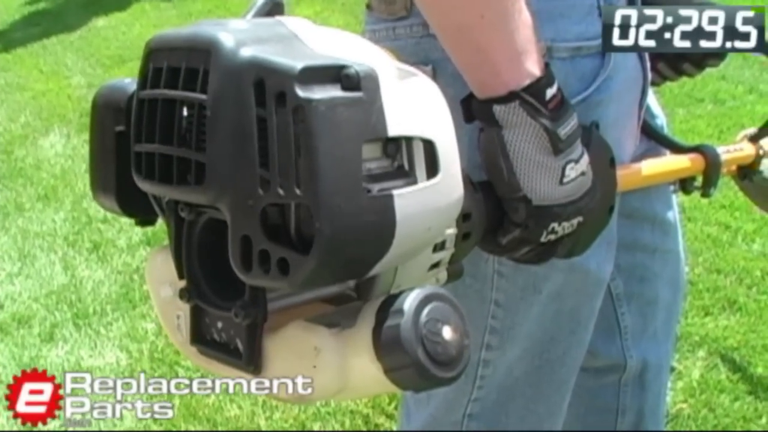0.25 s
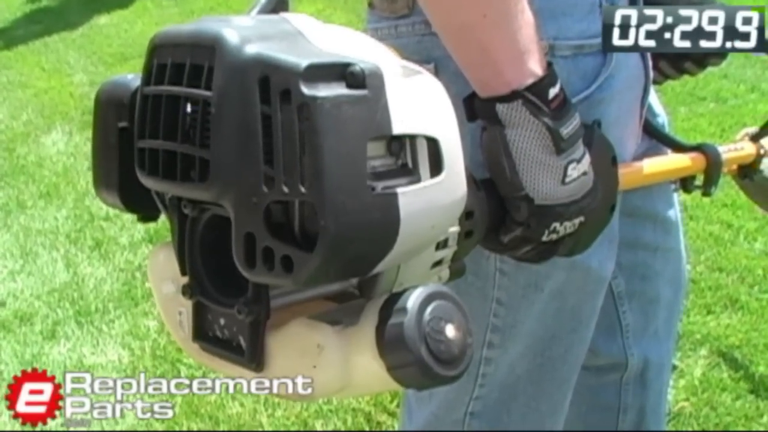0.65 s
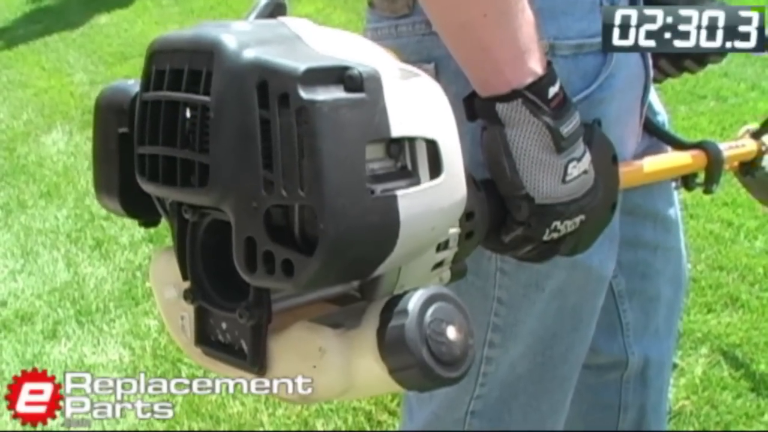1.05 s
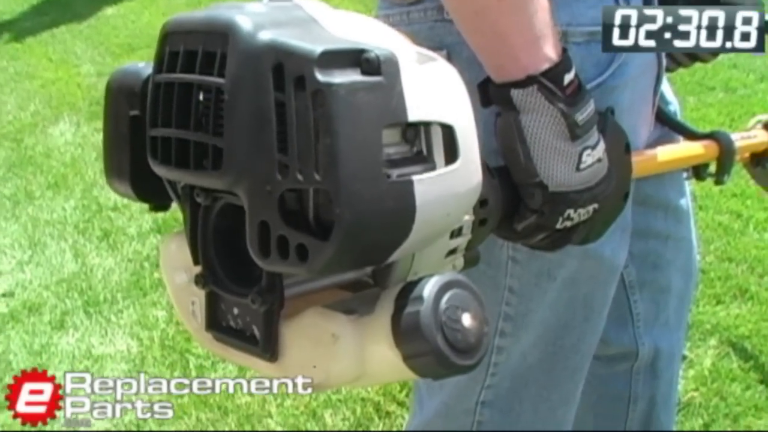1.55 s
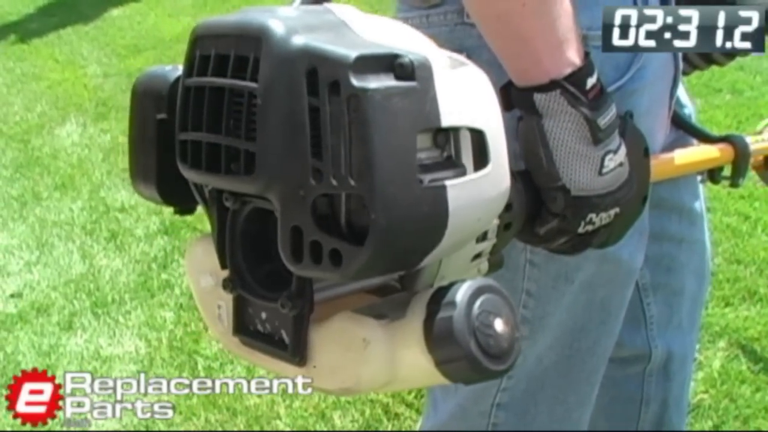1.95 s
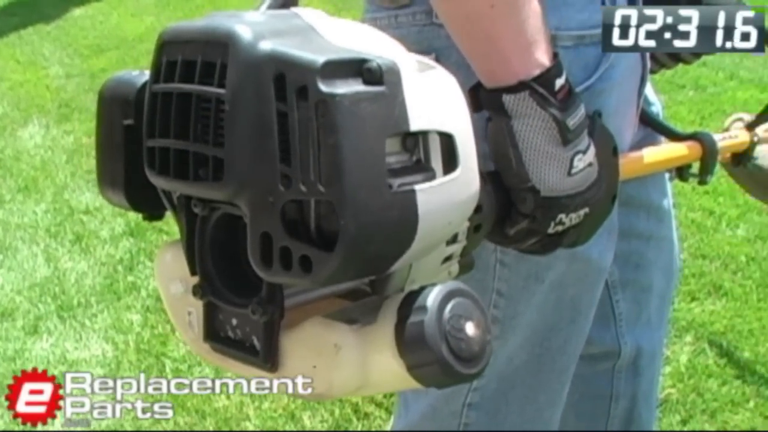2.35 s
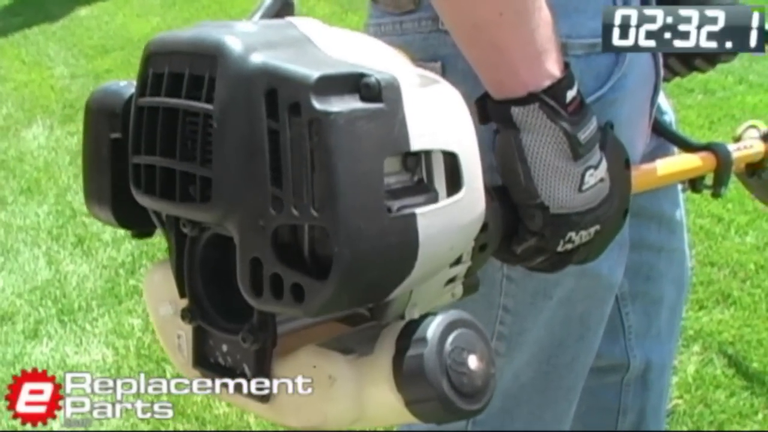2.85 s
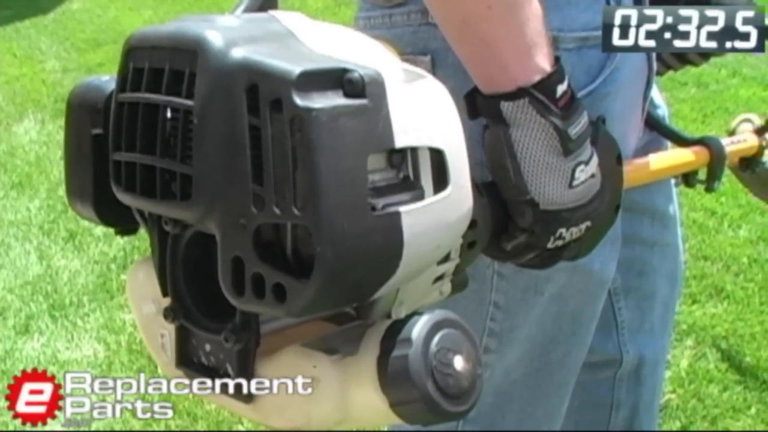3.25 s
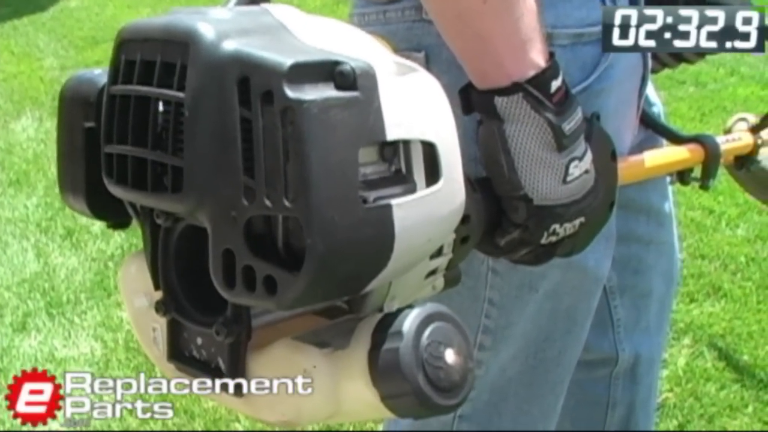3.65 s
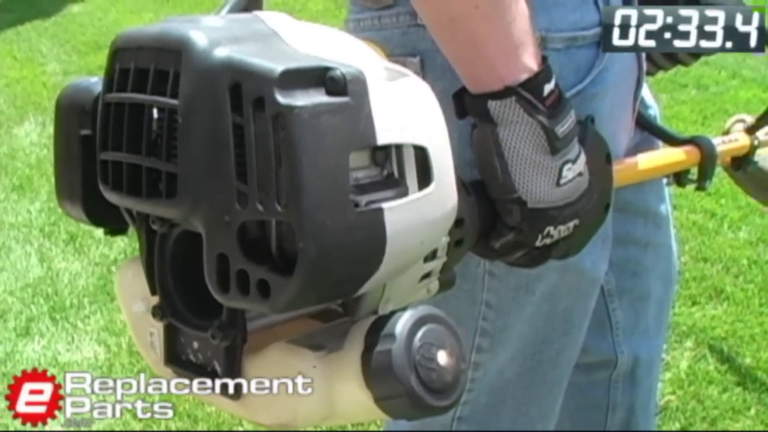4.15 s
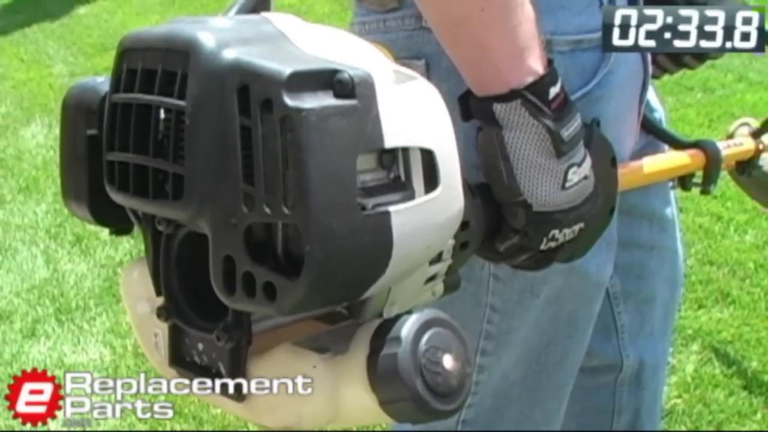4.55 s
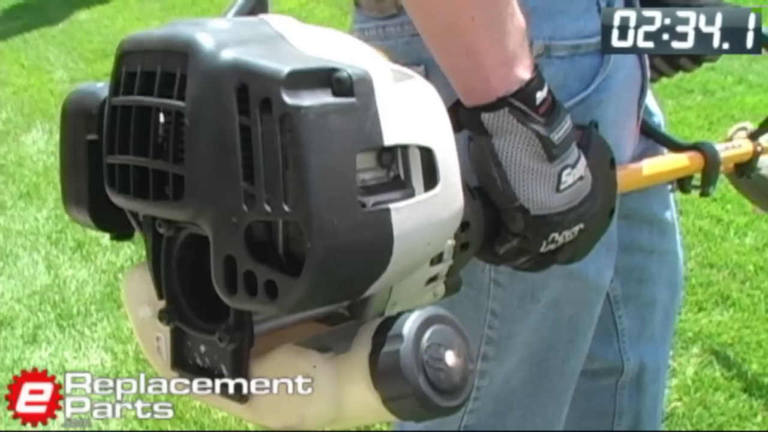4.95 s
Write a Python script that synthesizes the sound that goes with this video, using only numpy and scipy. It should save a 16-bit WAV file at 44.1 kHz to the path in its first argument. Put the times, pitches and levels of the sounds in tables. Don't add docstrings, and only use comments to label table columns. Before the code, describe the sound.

Close stereo pickup outdoors: a handheld petrol engine drones evenly with sharp exhaust pulses, airy rush and irregular small metal chatter. The drone settles a little lower and rougher under load, then after four seconds falls steeply, clutch and slack parts rattling and scraping. It stalls abruptly around 4.7 seconds with rapid knocks and a brief metallic ring, leaving quiet outdoor air and tiny liquid splashes.

```python
import sys
import numpy as np
from scipy import signal
from scipy.fft import rfft, irfft, next_fast_len
from scipy.io import wavfile

SR = 44100
rng = np.random.default_rng(int(sys.argv[2]) if len(sys.argv) > 2 else 0)


def rack_gain(trim_db):
    fader = np.asarray(trim_db, float)
    return 10 ** (fader / 20)


def file_out(sig):
    cols = np.atleast_2d(sig).T
    lim = np.clip(cols, -1, 1)
    pcm = np.round(lim * 32767).astype(np.int16)
    wavfile.write(sys.argv[1], SR, pcm)


N = 229757
SIZE = next_fast_len(N)
TIME = np.arange(N) / SR
STOP_S = 4.712


def unit(x):
    return x / np.sqrt(np.mean(x ** 2))


def curve(table, axis):
    rows = np.array(table)
    return np.interp(TIME, rows[:, 0], rows[:, axis])


def by_state(table, state, axis):
    rows = np.array(table)
    return np.interp(state, rows[:, 0], rows[:, axis])


def over_hz(table, size):
    rows = np.array(table)
    bins = np.log(np.fft.rfftfreq(size, 1 / SR) + 1)
    return np.interp(bins, np.log(np.maximum(rows[:, 0], 0) + 1), rows[:, 1])


def colour(x, table):
    return irfft(rfft(x, SIZE) * rack_gain(over_hz(table, SIZE)), SIZE)[:N]


def band(x, lo_hz, hi_hz):
    return signal.sosfilt(signal.butter(2, [lo_hz, hi_hz], "band", fs=SR, output="sos"), x)


def high_pass(x, hz):
    return signal.sosfilt(signal.butter(4, hz, "high", fs=SR, output="sos"), x)


def ring(x, modes):
    out = 0
    for k, (hz, width, db) in enumerate(modes):
        out = out + (-1) ** k * rack_gain(db) * signal.lfilter(*signal.iirpeak(hz, hz / width, SR), x)
    return out


def walk(rate):
    return np.interp(TIME * rate, np.arange(600), rng.standard_normal(600))


def bursts(rows, fade, rise):
    rows = np.array(rows)
    since = TIME - rows[:, :1]
    shape = np.exp(-np.abs(since) / np.where(since > 0, fade, rise))
    return np.sum(rack_gain(rows[:, 1:2]) * shape, axis=0)


# f/Hz, level/dB per Hz
GARDEN_SPECTRUM = [(12, -89), (20, -65), (110, -26), (167, -11), (346, -18), (445, -12), (572, -18.5),
                   (1150, -11), (1800, -21), (7480, -26), (15900, -54)]
# t/s, garden level/dB
GAIN_LIFT = [
    (4.6, -45),
    (4.75, -40),
    (4.85, -42.5),
    (4.95, -38.5),
    (5.08, -37.5),
    (5.21, -35),
]
# t/s, peak level/dB
SLOSHES = [(4.8, -31), (4.9051, -55), (4.9245, -27.5), (5.0018, -42), (5.0522, -25), (5.1196, -26),
           (5.1385, -43), (5.1615, -23)]


def garden():
    lift = rack_gain(curve(GAIN_LIFT, axis=1))
    fizz = rack_gain(3.5 * walk(110))
    tank_modes = [(110, 110, 3.5), (240, 130, 8.5), (1150, 200, -1)]
    drop_modes = [(4200, 1600, 3), (7200, 600, 1), (10000, 1400, -8), (12100, 850, -11)]
    out = []
    for _ in range(2):
        air = rng.standard_normal((4, N))
        bed = unit(colour(air[0], GARDEN_SPECTRUM)) * rack_gain(-6.5 + 1.334 * walk(37))
        tank = unit(ring(air[2], tank_modes)) * rack_gain(-20.5 + 1.1 * walk(35))
        trickle = unit(ring(air[3], drop_modes)) * fizz * rack_gain(-14.0)
        splashes = band(air[1], 1500, 8000) * bursts(SLOSHES, .006, .003) * rack_gain(-10)
        out.append((bed + tank + trickle) * lift + splashes)
    return out


def coasting():
    fuel_out_s, slacken_s = 4.13, 0.094
    return np.clip((TIME - fuel_out_s) / slacken_s, 0, 1)


def ground_shake(air, running):
    return unit(band(air, 18, 55)) * running * rack_gain(-68)


# f/Hz, level/dB per Hz
RUSH_SPECTRUM = [(20, -63), (60, -19), (110, -42), (200, -40), (350, -11), (600, -13.5), (1000, 1),
                 (1700, -11), (2600, 0), (4200, 3.5), (6900, -2), (9000, -18.5), (15900, -21.5)]


def gas_rush(air, throb, level):
    return unit(colour(throb * air, RUSH_SPECTRUM)) * level * rack_gain(-3.0 + .5 * walk(21))


# f/Hz, width/Hz, level/dB
JINGLE_MODES = [(7660, 750, -2), (9230, 470, 3), (10360, 690, -1), (11260, 300, 5.5), (12000, 520, 2),
                (14800, 2900, -10)]
# t/s, peak level/dB
CHATTER_EVENTS = [(0.0802, -31), (0.3722, -22), (0.633, -20), (0.6978, -27), (0.8445, -20), (0.9906, -25),
                  (1.1433, -21), (1.2979, -18), (1.5289, -31), (1.6761, -15), (1.924, -12), (2.0906, -20),
                  (2.1885, -35), (2.5207, -21), (2.5735, -35), (2.7791, -20), (2.9058, -29), (3.0196, -39),
                  (3.1206, -27), (3.253, -26), (4.2318, -32), (4.2971, -38)]


def jingle(air, throb, level, chatter):
    return unit(ring(throb * air, JINGLE_MODES)) * level * chatter * rack_gain(-4.5 + 0.88 * walk(35))


# f/Hz, width/Hz, level/dB
LOOSE_MODES = [(900, 300, -12), (1390, 180, 1), (1880, 200, -8), (2600, 300, -10), (4600, 300, -12),
               (5600, 500, 3)]


def loose_parts(drive, level):
    return unit(ring(drive, LOOSE_MODES)) * coasting() * level * rack_gain(-6.5 + 1.7 * walk(14))


# f/Hz, width/Hz, level/dB
RASP_MODES = [(5300, 200, -7.5), (5730, 230, 2), (4560, 99, -7)]


def clutch_rasp(air, throb):
    return unit(ring(throb ** 2 * air, RASP_MODES)) * coasting() * rack_gain(-30)


# f/Hz, width/Hz, level/dB
CASING_MODES = [(1275, 450, 1.5), (1900, 620, -0.5), (2625, 130, 4.5), (3510, 50, 4.5), (3767, 110, 5),
                (4260, 140, 3.5), (4920, 300, -8), (5514, 190, 7), (6960, 550, 4), (6700, 200, -19)]


def casing(drive, slack, mid, high):
    low_modes = unit(ring(drive, CASING_MODES[:3])) * mid * rack_gain(-9.0 - 1.4 * slack)
    high_modes = unit(ring(drive, CASING_MODES[3:])) * high * rack_gain(-6.5 - 7.5 * slack)
    return low_modes + high_modes


# t/s, level/dB, fade/s
LAST_KNOCKS = [
    (4.711, -20, .006),
    (4.728, -20.5, .008),
    (4.738, -22, .013),
]
# f/Hz, level/dB per Hz
KNOCK_SPECTRUM = [(59, -82), (100, -32), (1030, -10), (1220, 0.5), (2500, -13), (2840, -18), (3590, -9.5),
                  (4070, -9.5), (6350, -23), (12000, -25), (15800, -37)]


def stall_knocks(air):
    fades = np.array(LAST_KNOCKS)[:, 2:]
    return bursts(LAST_KNOCKS, fades, .0005) * unit(colour(air, KNOCK_SPECTRUM))


# f/Hz, width/Hz, level/dB
BELL_MODES = [(1820, 8, 0), (3618, 12, -17), (4317, 7, -7), (4640, 12, -11), (7542, 12, -18)]


def drum_bell():
    blow = signal.unit_impulse(N, int(LAST_KNOCKS[-1][0] * SR))
    return ring(blow, BELL_MODES) * rack_gain(25)


def slaps(turns, place, scatter_db, jitter, steady):
    chance = rng.standard_normal((int(turns[-1]), 2))
    crank = np.arange(len(chance)) + place + jitter * chance[:, 0]
    at = np.interp(crank, turns, np.arange(N))
    i = np.minimum(at.astype(int), N - 2)
    size = (rack_gain(scatter_db * chance[:, 1]) - 1 + steady) * (at < STOP_S * SR)
    return np.bincount(i, size * (1 - at % 1), N) + np.bincount(i + 1, size * (at % 1), N)


def piston_slap(turns):
    early = slaps(turns, 0.027, 2.2, 0.0071, steady=0)
    middle = slaps(turns, .24, 2.1, 0.0041, steady=0)
    late = slaps(turns, .6, 1.9, 0.0288, steady=0)
    return unit(early + middle + 5.4 * late)


def combustion_crack(turns, slack, level):
    clicks = slaps(turns, 0, 4, .002, steady=1)
    return unit(band(clicks, 900, 6500)) * level * (1 - slack) * rack_gain(-11)


# f/Hz, width/Hz, level/dB
SINGING_MODE = [(1830, 75, 0)]
# state, level/dB
WHINE_LEVEL = [(0, -33), (1, -32.5), (2, -32), (2.75, -37)]


def drum_whine(orders, state, strength):
    singing = unit(ring(ring(orders, SINGING_MODE), SINGING_MODE))
    level_db = by_state(WHINE_LEVEL, state, axis=1) - 7 * coasting()
    return singing * rack_gain(level_db + 1.6 * walk(9) + 0.48 * strength)


# t/s, rotation rate f/Hz, exhaust level/dB
SHAFT_RUN = [(0.34, 123.4, -25.5), (0.48, 121.7, -25.5), (0.68, 123.2, -26), (1.1, 123.6, -25.5),
             (1.6, 120.9, -26.5), (1.75, 118.8, -27.5), (1.86, 115.8, -25.5), (2.14, 113.9, -26),
             (2.45, 114.9, -25), (2.64, 110.9, -24.5), (3.1, 111.8, -24.5), (3.3, 113.8, -24.5),
             (4.15, 113.1, -25), (4.3, 107, -28.5), (4.44, 89.7, -30), (4.57, 74.17, -30.5),
             (4.68, 58.2, -34), (4.72, 54.45, -37)]


def shaft_turns():
    return np.cumsum(curve(SHAFT_RUN, axis=1) * (1 + 0.002003 * walk(20))) / SR


# shaft order, then level/dB when free, held back, loaded, starving
PULSE_ORDERS = [(1, -12.5, -13, -14.5, -14), (2, -16, -9, -10, -1), (3, -4.5, -4, -7, -4.5),
                (4, -7, -8, -7.5, -3), (5, 3, 1.5, -1.5, -3), (6, -5.5, -2.5, -6, -2),
                (7, -1, -1, -7.5, -17), (8, 3.5, 2, 1.5, -13), (9, -2.5, -4, -6, -3),
                (10, -6.5, -9, -21, -7), (11, -7.5, -2, -2.5, -4.5), (12, -19.5, -16, 0, -11),
                (13, -28, -5.5, -11, -8)]
# f/Hz, width/Hz, level/dB
BLOCK_MODES = [(1414, 53, -8), (1773, 140, -4.5), (2050, 90, -9), (2500, 94, -5.5), (2775, 94, -11.5),
               (3273, 75, -6.5), (3650, 260, -9), (3850, 43, -11), (4175, 86, -7.5), (4515, 140, -5.5),
               (4800, 82, -24), (5050, 240, -11)]


def exhaust(turns, state):
    pulse, shaft = np.array(PULSE_ORDERS)[:, 1:], curve(SHAFT_RUN, axis=1)
    grid = np.arange(0, 6000, 5)
    block_power = rack_gain(2 * -14.5)
    for hz, width, db in BLOCK_MODES:
        block_power = block_power + rack_gain(2 * db) / (1 + (2 * (grid - hz) / width) ** 4)
    block_db = 10 * np.log10(block_power)
    top_order = 44
    delay = rng.uniform(0, .62, top_order)
    delay = np.r_[np.zeros(8), np.full(5, .22), delay[13:]]
    split, coast = np.pi * np.clip(state - 2, 0, 1), coasting()
    out = 0
    for k, late in enumerate(2 * np.pi * np.cumsum(delay)):
        order = k + 1
        if k < len(pulse):
            db = np.interp(state, np.arange(4), pulse[k])
        else:
            through_block = np.interp(order * shaft, grid, block_db) + 1.3 * coast
            echo_db = 4.5 * np.cos(2 * np.pi * order / 7.1)
            floor_db = -7.5 - 0.6 * (k - 13) + echo_db - 30 * (1 - coast)
            db = np.maximum(through_block, floor_db)
        db = db - .04 * k + 2 * (k == 0) - 1.4 * split * (k < 2)
        db = db + (.1 + .05 * k * (1 - coast / 2)) * walk(30)
        phase = 2 * np.pi * order * turns - late - split * np.clip(k - 4, 0, 5)
        phase = phase - 2.5 * (k == 0) + .011 * k * walk(40)
        out = out + rack_gain(db) * np.cos(phase)
    return unit(out)


# t/s, state, depth of the once-a-turn throb as level/dB
ENGINE_STATE = [
    (0, 0.05, 7.5),
    (1.65, 0.028, 7.9),
    (1.9, 1.04, 8.7),
    (2.5, 1.3, 6.6),
    (2.65, 1.9, 7.1),
    (4.2, 1.739, 6.1),
    (4.42, 2.71, 8.7),
    (4.7, 2.83, 2.56),
]
# state, casing level/dB, rush level/dB, jingle level/dB
STATE_LEVELS = [(0, -22, -25.5, -30.5), (1, -24, -25, -30), (2, -21.5, -24.5, -30.5),
                (2.75, -20.5, -20.5, -30), (3, -21, -32, -54)]
# f/Hz, width/Hz, level/dB
DRUM_MODE = [(1830, 90, 0)]


def engine():
    turns = shaft_turns()
    running = np.exp(-np.maximum(TIME - STOP_S, 0) / .004)
    state = curve(ENGINE_STATE, axis=1)
    slack = np.clip(state - 2, 0, 1)
    mid, high, top = (rack_gain(by_state(STATE_LEVELS, state, axis=k)) for k in (1, 2, 3))
    count = int(turns[-1]) + 2
    strength = np.interp(turns, np.arange(count), rng.standard_normal(count))
    throb_db = curve(ENGINE_STATE, axis=2) / 2 * np.cos(2 * np.pi * (turns - .1))
    throb = rack_gain(throb_db + 0.96 * strength) * running
    hits = piston_slap(turns)
    orders = exhaust(turns, state) * running
    chatter = 1 + 12 * bursts(CHATTER_EVENTS, 0.0057, 0.002)
    both = []
    for share in (1, 0):
        air = rng.standard_normal((3, N))
        gas = throb * air[0]
        metal = casing(share * 0.31 * hits + 0.67 * gas, slack, mid, high)
        metal = metal + loose_parts(share * orders + 0.097 * gas, mid)
        rush = gas_rush(air[1], throb, high) * running
        small = jingle(air[2], throb, top, chatter) + clutch_rasp(air[1], throb)
        both.append(metal + rush + small + stall_knocks(air[0]) + ground_shake(air[2], running))
    crack = combustion_crack(turns, slack, high)
    pulses = (orders - ring(orders, DRUM_MODE)) * rack_gain(curve(SHAFT_RUN, axis=2) + 3.0)
    tone = (pulses + drum_whine(orders, state, strength)) * running
    return both[0] + crack + drum_bell() + high_pass(tone, 112), both[1]


# f/Hz, lead of the left/rad
PHASE_LEAD = [(0, -1.14), (950, 0.67), (1980, 0.56), (3790, 0.71), (5080, 0.84), (5600, -0.51), (6290, 1),
              (7320, -0.097), (8270, -0.24), (9990, 1), (10200, 0.51), (12400, 0.45), (13600, 0.2),
              (15600, 0.0)]
# f/Hz, left minus right level/dB
BODY_SHADING = [(60, -0.5), (400, 0.8), (700, -.5), (2400, -0.1), (4400, 2), (6000, 5), (8100, -5),
                (12000, -3), (15000, 1.5)]
# f/Hz, level/dB
INCOHERENCE = [(30, 7), (60, -12), (100, -27), (800, -20), (2000, -19), (4000, -16), (9000, -8),
               (15000, -7)]


def scene():
    far, far_other = garden()
    near, other = engine()
    turn = rack_gain(over_hz(BODY_SHADING, SIZE) / 2) * np.exp(.5j * over_hz(PHASE_LEAD, SIZE))
    shared = rfft(near + far, SIZE)
    side = colour(other, INCOHERENCE) + far_other * rack_gain(-13) - 0.091 * far
    left = irfft(shared * turn, SIZE)[:N] + side
    right = irfft(shared / turn, SIZE)[:N] - side
    return np.array([left, right])


def top_cut(x):
    return signal.sosfilt(signal.butter(12, 16050, fs=SR, output="sos"), x)


def record(dry):
    rounded = np.tanh(1.3 * dry) / 1.3
    cut = signal.sosfilt(signal.ellip(8, .2, 60, 15800, fs=SR, output="sos"), rounded)
    return top_cut(cut)


dry = scene()
out = record(dry)
file_out(out)
```